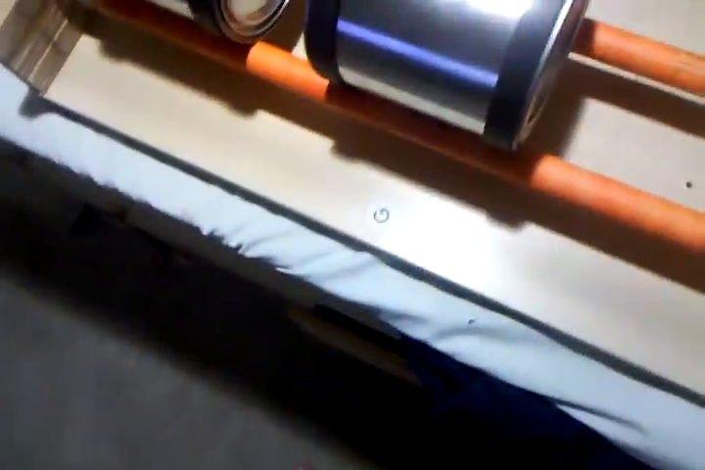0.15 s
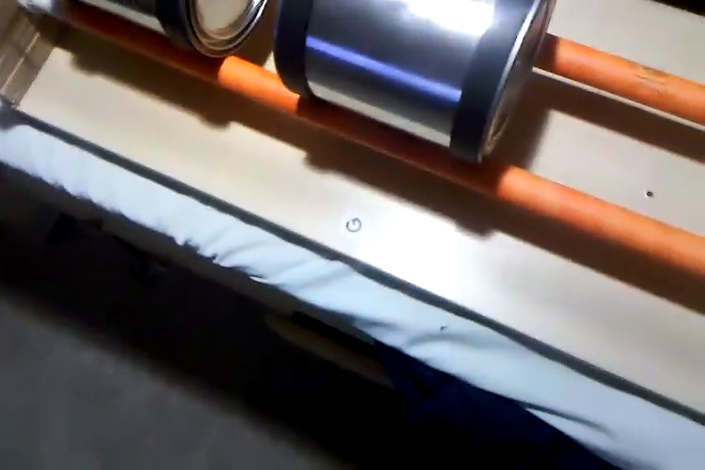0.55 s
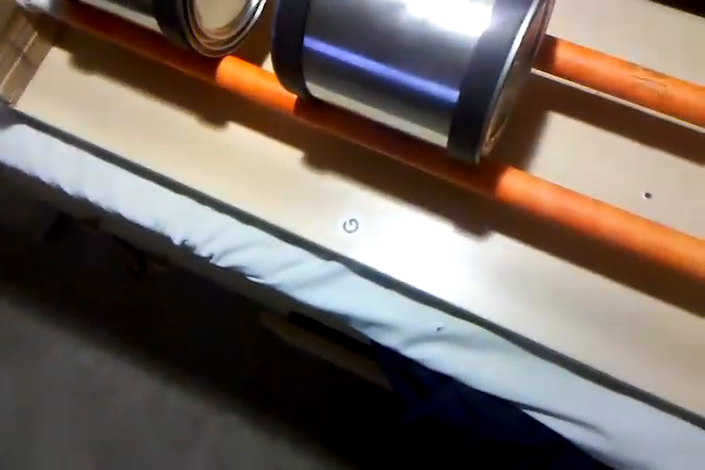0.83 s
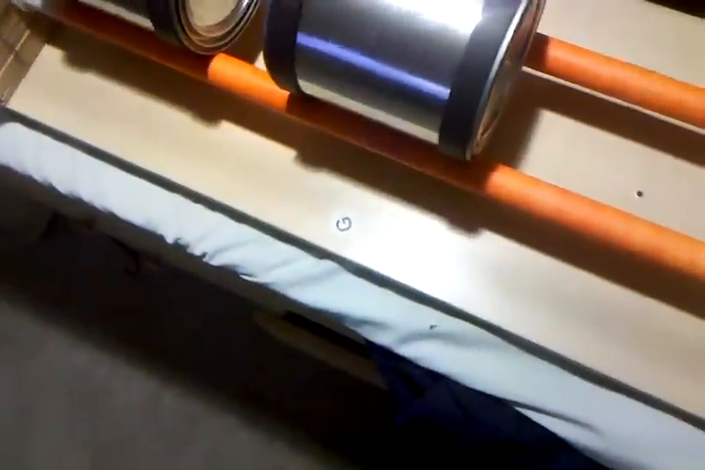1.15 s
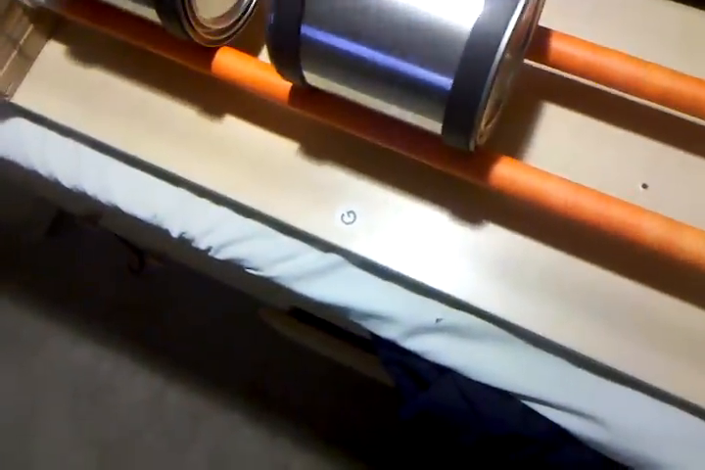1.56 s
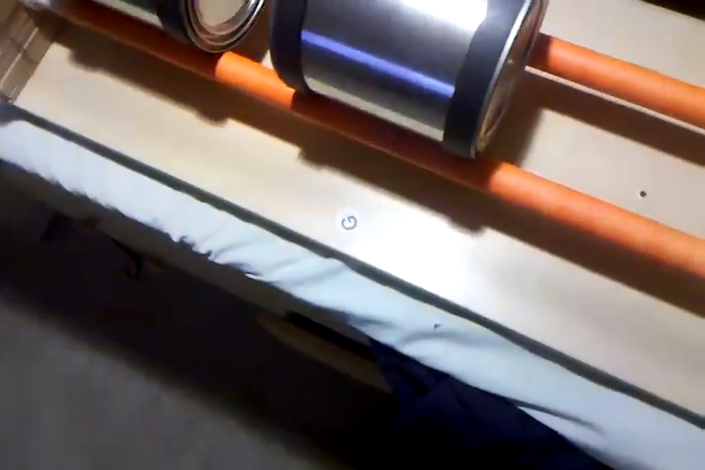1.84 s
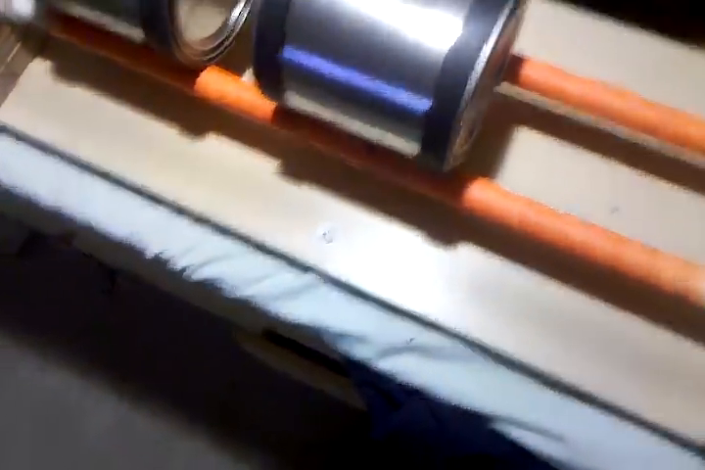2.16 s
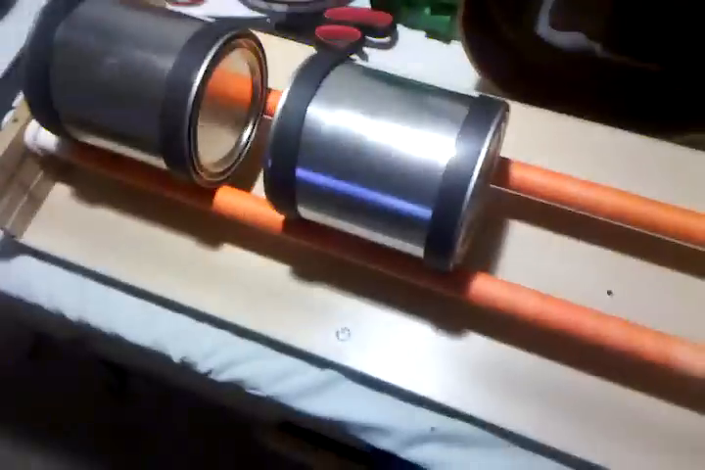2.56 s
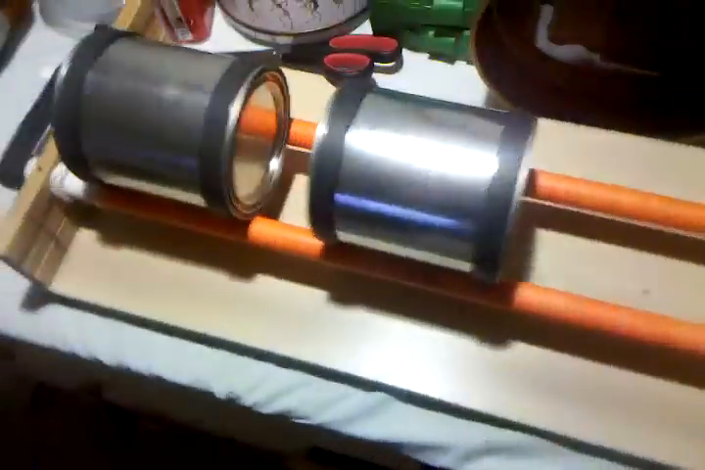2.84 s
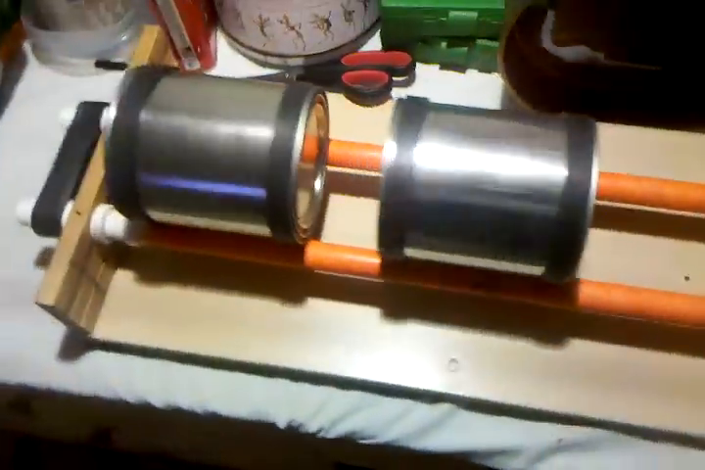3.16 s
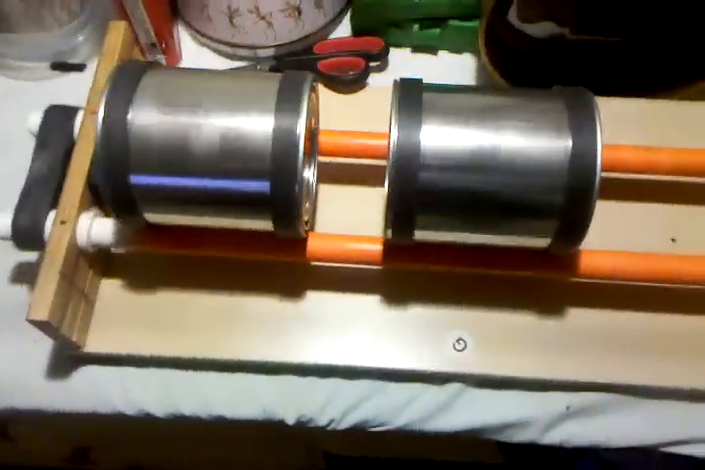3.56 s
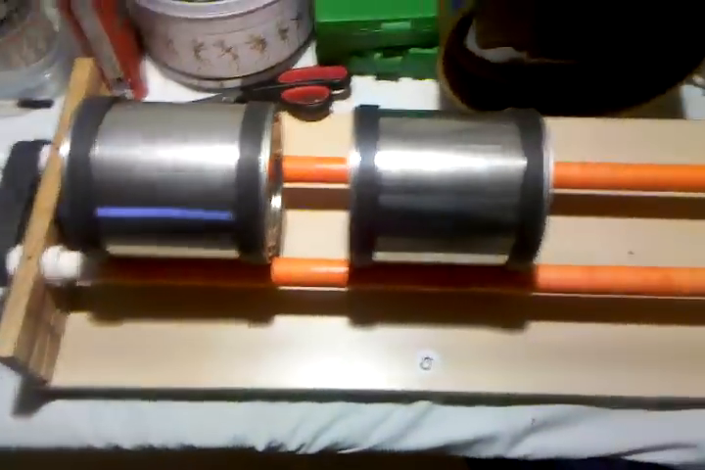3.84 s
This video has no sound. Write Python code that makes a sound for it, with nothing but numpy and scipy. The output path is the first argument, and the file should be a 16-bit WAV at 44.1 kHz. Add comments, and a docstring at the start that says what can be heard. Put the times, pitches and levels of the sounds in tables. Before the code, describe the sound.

Stones tumbling in two metal cans, heard close up indoors. Over a dull rumble, a light tap comes at 0.2 seconds and two sharp switch clicks around 0.8. At 1.1 a small geared motor grinds briefly and spins up, its whine strongest near 1.5. From 1.4 until the end at 4 seconds, the stones rattle and knock loudly in uneven, ringing clumps over roller hiss and a softer whine.

```python
"""Indoors, in a quiet room, with the microphone close to two rollers on a wooden frame.
Over a dull rumble come a light tap and the two clicks of a switch. A small geared motor grinds
briefly and spins up, its gears whining through their housing as it turns the rollers. Two metal
cans ride on them; the stones inside tumble and knock on the walls in clumps, making them ring.
The room gives the clicks and knocks a short tail."""
import sys
import numpy as np
from scipy import signal
from scipy.fft import rfft, irfft
from scipy.io import wavfile

SR = 44100
rng = np.random.default_rng(int(sys.argv[2]) if len(sys.argv) > 2 else 0)


def pcm_store(signal):
    """Save signal as 16-bit PCM."""
    levels = np.round(np.clip(np.atleast_2d(signal), -1, 1) * 32767)
    wavfile.write(sys.argv[1], SR, levels.astype(np.int16).T)


N = 176400

# Vigour of the tumbling stones. Each row: time in seconds, level in dB.
TUMBLE = [(1.38, -27.5), (1.45, -6.5), (1.62, -11), (1.72, -26), (1.82, -7.5), (2.0, -26), (2.08, -16.5),
          (2.3, -11.5), (2.42, -14.5), (2.66, -21), (2.76, -14), (2.9, -16), (3.13, -19.5), (3.2, -11),
          (3.5, -11), (3.62, -20), (3.7, -10.5), (3.9, -18), (4, -5)]


def amp(db):
    return 10 ** (np.asarray(db) / 20)


def rms_one(x):
    return x / np.sqrt(np.mean(x ** 2) + 1e-20)


def in_time(rows, before_db=None):
    s, db = np.transpose(rows)
    return np.interp(np.arange(N) / SR, s, db, left=before_db)


def level_at(spectrum, hz):
    at, db = np.transpose(spectrum)
    return np.interp(np.log(hz), np.log(at), db)


def drift(rate_hz):
    """Slow random wander, spread 1."""
    r = np.exp(-80 * np.pi * rate_hz / SR)
    slow = signal.lfilter([1], [1, -2 * r, r * r], rng.standard_normal(N // 40 + 2002))[2000:]
    return np.interp(np.arange(N) / 40, np.arange(len(slow)), rms_one(slow))


def noise(spectrum):
    """Noise shaped to a spectrum, flat above 7 kHz; rms 1."""
    hz = np.clip(np.fft.rfftfreq(N, 1 / SR), 1, 7000)
    return rms_one(irfft(rfft(rng.standard_normal(N)) * amp(level_at(spectrum, hz)), N))


def ring(x, hz, t60):
    """A unit click sets a sine of height 1 ringing."""
    r, w = amp(-60 / (t60 * SR)), 2 * np.pi * hz / SR
    return signal.lfilter([0, np.sin(w)], [1, -2 * r * np.cos(w), r * r], x + 1e-18)


def blows(s, db, main_hz, colour, cycles, main_db, scatter_db, main_cycles=48, spread_s=.0012):
    """Each blow starts a main ring and 30 scattered ones, 60 dB down after their cycles; it peaks at db."""
    out, t = np.zeros(N + SR), np.arange(2000) / SR
    for start, peak_db, main, (detune, gain, lag) in zip(s, db, main_hz, rng.random((len(s), 3, 30))):
        hz = np.geomspace(400, 7200, 30) * (1 + 0.22 * (detune - .5))
        level = np.append(level_at(colour, hz) + scatter_db * (2 * gain - 1), main_db)
        life = np.append(np.full(30, cycles), main_cycles)
        delay = np.append(spread_s * lag ** 2, 0)
        age = np.maximum(t - delay[:, None], 0) * np.append(hz, main)[:, None]   # in cycles
        wave = amp(level) @ (amp(-60 * age / life[:, None]) * np.sin(2 * np.pi * age))
        i = int(start * SR)
        out[i:i + len(t)] += amp(peak_db) * wave / np.abs(wave).max()
    return out[:N]


def room_floor():
    """Room tone: a dull lumpy rumble with two wavering hums."""
    # Colour of the rumble. Each row: frequency in Hz, relative density in dB.
    colour = [(53, -32), (90, -7), (170, -7.5), (241, -10), (447, -10.5), (831, -18.5), (1170, -22.5),
              (7000, -41.5)]
    # Faint hums. Each row: pitch in Hz, level in dB.
    tones = [(104, -50.5), (895, -60.5)]
    t = np.arange(N) / SR
    hums = sum(amp(db + 1.2 * drift(6.5)) * np.sin(2 * np.pi * hz * t + 0.27 * drift(11))
               for hz, db in tones)
    return amp(-47 + drift(6.6)) * noise(colour) + hums


def clicks():
    """The tap and the switch clicks ring a small hard body."""
    # Tap and clicks. Each row: start in seconds, peak in dB.
    hits = [(0.1684, -28), (.177, -21), (.1945, -32), (.7622, -6), (0.7648, -12), (0.8336, -11)]
    # How strongly the switch body rings. Each row: frequency in Hz, relative level in dB.
    body = [(680, -26), (1230, -20), (1650, -6.5), (2300, -2.5), (3560, -1.5), (4300, -3), (5370, -1.5),
            (6500, 7.5)]
    s, db = np.transpose(hits)
    x = blows(s, db, np.full(len(s), 3560.), body, cycles=55, main_db=3, scatter_db=4)
    return signal.sosfilt(signal.butter(2, 550, "high", fs=SR, output="sos"), x)


def room(x, t60=0.36):
    """Reflections from the walls merge into a dying noise tail."""
    t = np.arange(SR // 2) / SR
    tail = rng.standard_normal(len(t)) * amp(-60 * t / t60) * np.minimum(t / 0.0067, 1)
    return signal.fftconvolve(x, tail / np.sqrt(np.sum(tail ** 2)))[:N]


def motor(start_s=1.09, spinup_s=.17, full_hz=235.6, creep_hz_per_s=1.3):
    """The rotor spins up, then creeps faster, sounding one cycle a turn and driving the gears."""
    # Rotor tone. Each row: time in seconds, level in dB.
    levels = [(1.15, -46), (1.3, -40), (1.5, -34.5), (1.75, -39), (2.8, -36.5), (4, -42)]
    running_s = np.maximum(np.arange(N) / SR - start_s, 0)
    speed = 1 - np.exp(-running_s / spinup_s)
    rotor_hz = (full_hz + creep_hz_per_s * running_s) * speed
    turns = np.cumsum(rotor_hz) / SR
    rotor = amp(in_time(levels, -120) + drift(24)) * np.sin(2 * np.pi * turns)
    return rotor + gear_whine(turns, speed) + gear_overtones(turns, speed, rotor_hz)


def gear_whine(turns, speed, swell_db=8, swell_s=.3):
    """Meshing teeth whine through the resonant housing, rough at low speed and louder under load."""
    # Gear partials. Each row: multiple of rotor speed, relative level in dB, top of its swell in seconds.
    partials = [(10.95, -9, 2.8), (11.5, -14, 3.1), (12.0, 0, 3.85), (12.51, -8, 3.4)]
    # Load on the gears. Each row: time in seconds, gain of the whine in dB.
    load = [(1.1, -70), (1.13, -40), (1.18, -41), (1.25, -38), (1.38, -30.5), (1.5, -26.5), (1.7, -47.5),
            (2.5, -43), (4, -42)]
    # Gearbox resonances. Each row: centre in Hz, width in Hz, gain over the plain whine in dB.
    housing = [(720, 280, -3.5), (1260, 200, 16.5), (2010, 76, 3), (2620, 180, 7.5)]
    t, mesh = np.arange(N) / SR, np.zeros(N)
    for multiple, db, top_s in partials:
        swell = swell_db * np.exp(-((t - top_s) / swell_s) ** 2)
        flicker = drift(14) + 7.7 * (1 - speed) * drift(150)
        mesh += amp(db + swell + flicker) * np.sin(2 * np.pi * multiple * (turns + .002 * drift(80)))
    resonances = sum(amp(db) * signal.lfilter(*signal.iirpeak(hz, hz / width, fs=SR), mesh)
                     for hz, width, db in housing)
    return amp(in_time(load, -120)) * (mesh + resonances)


def gear_overtones(turns, speed, rotor_hz):
    """High overtones of the whine sound while the motor strains up to speed."""
    # Overtones. Each row: multiple of rotor speed, relative level in dB.
    overtones = [(24, -20), (36, -17), (48, -16)]
    # What the housing lets out. Each row: frequency in Hz, gain in dB.
    outlet = [(2600, -20), (3300, -2), (4500, -4), (4900, -25), (5900, 0)]
    strain = speed ** 3 * (1 - speed)
    out = np.zeros(N)
    for multiple, db in overtones:
        level = amp(db + level_at(outlet, multiple * rotor_hz + 1) + 3.6 * drift(150))
        out += level * np.sin(2 * np.pi * multiple * (turns + .004 * drift(120)))
    return strain * out


def roller_hiss(tumble_share=.25, mean_tumble_db=-18):
    """Motor and rollers hiss, following a share of the tumbling's swing in level."""
    # Course of the hiss. Each row: time in seconds, base level in dB.
    levels = [(1.09, -55), (1.17, -49), (1.29, -27), (1.66, -16.5), (2.45, -18), (2.68, -15.5), (3.43, -15),
              (3.72, -18.5), (4.0, -17)]
    # Its colour. Each row: frequency in Hz, relative density in dB.
    colour = [(60, -45), (100, -13), (230, -15.5), (300, -17), (415, -12.5), (850, -9), (1600, -17.5),
              (2600, -3), (4500, -12), (6600, -2)]
    swing_db = tumble_share * (in_time(TUMBLE) - mean_tumble_db)
    return amp(in_time(levels, -120) + swing_db + 1.2 * drift(30)) * noise(colour)


def startup_grind(start_s=1.1, rise_s=0.04, fall_s=0.06):
    """A short rough burst as the motor gets going."""
    # Colour of the grind. Each row: frequency in Hz, relative density in dB.
    colour = [(400, -48), (580, -19), (654, -3), (871, -7), (2240, -4), (4440, -23.5), (7000, -11.5)]
    age = np.maximum(np.arange(N) / SR - start_s, 0)
    swell = (1 - np.exp(-age / rise_s)) * np.exp(-age / fall_s)
    return amp(-13 + 2.8 * drift(45)) * swell * noise(colour)


def cans(ticks_per_s=300, ring_cycles=45):
    """Stones strike the can walls: loud knocks over clumps of small ringing ticks."""
    # Loudest knocks. Each row: start in seconds, peak in dB, main pitch in Hz.
    hits = [(1.431, -6.5, 2020), (1.446, -2, 2600), (1.474, -5, 2440), (1.559, -3.5, 2500),
            (1.586, -5.5, 2550), (1.61, -5.5, 2620), (1.75, -5.5, 2550), (1.796, -3.5, 2350),
            (1.843, -5.5, 2230), (2.064, -2.5, 2620), (2.205, -4.5, 2400), (2.232, -0.5, 2320),
            (2.25, -4.5, 2180), (2.275, -0.5, 2320), (2.321, -4, 2800), (2.343, -3.5, 2540),
            (2.38, -0.5, 2310), (2.457, -13, 2250), (2.48, -5, 2360), (2.544, -3, 2230), (2.565, -6, 1384),
            (2.593, -3, 4000), (2.652, -13, 2520), (2.702, -2, 2610), (2.779, 1.5, 1800), (2.857, -8, 2610),
            (2.946, -7, 2230), (2.977, -7, 2030), (3.047, -3, 5900), (3.108, -7.5, 2680),
            (3.148, -7.5, 2280), (3.17, -5, 2120), (3.286, -8, 2380), (3.323, -2, 2440),
            (3.396, -9.5, 2350), (3.422, -4.5, 5170), (3.441, -9.5, 2380), (3.487, -1.5, 2250),
            (3.532, -1.5, 2330), (3.685, -5, 2960), (3.721, -5.5, 2080), (3.764, -9, 2870),
            (3.799, -2, 3280), (3.95, -6.5, 2280), (3.977, -2, 2240), (1.204, -16.5, 670),
            (1.384, -16, 3860), (1.4465, -9.5, 4950), (2.2325, -6, 4600), (1.502, -7.5, 2080),
            (1.645, -5, 2230), (2.3815, 2.5, 4034), (2.395, -4, 2320), (2.483, -12.5, 1390),
            (3.186, -2, 2220), (3.215, -5.5, 2200), (3.294, -4.5, 2370), (3.359, -13.5, 421),
            (3.543, -2, 3560)]
    # How strongly cans and stones ring. Each row: frequency in Hz, relative level in dB.
    body = [(400, -50), (800, -23), (1400, -16), (2300, -4), (3200, -4.5), (4200, -0.5), (5500, -4),
            (7000, -3.5)]
    at = np.flatnonzero(rng.random(N) < ticks_per_s * amp(3 * drift(25)) / SR)
    size_db = 3 * np.minimum(rng.exponential(1, len(at)), 2)
    ticks = np.zeros(N)
    for hz in np.geomspace(400, 7200, 36):
        strength = amp(level_at(body, hz) + size_db + rng.normal(0, 4.5, len(at)))
        onsets = np.minimum(at + rng.integers(0, 30, len(at)), N - 1)
        kicks = np.zeros(N)
        kicks[onsets] = strength * rng.choice([-1, 1], len(at))
        ticks += ring(kicks, hz, ring_cycles / hz)
    rattle = amp(in_time(TUMBLE, -120) - 11) * rms_one(ticks)
    s, db, pitch = np.transpose(hits)
    knocks = blows(s, db, pitch, body, ring_cycles, main_db=8, scatter_db=8)
    return signal.sosfilt(signal.butter(4, 380, "high", fs=SR, output="sos"), knocks + rattle)


def scene():
    """The sound at one microphone, mostly direct; only the struck sounds reverberate."""
    struck = clicks() + cans()
    drive = motor() + roller_hiss() + startup_grind()
    return (room_floor() + struck + amp(-12) * room(struck) + drive)[None]


def record(dry, overload=.76):
    """The microphone path loses bass and treble, the loudest peaks clip, the top is cut."""
    x = signal.sosfilt(signal.butter(8, 94, "high", fs=SR, output="sos"), dry)
    x = signal.sosfilt(signal.ellip(5, 1, 37, 6850, fs=SR, output="sos"), x)
    x = signal.sosfilt(signal.ellip(10, .5, 70, 9100, fs=SR, output="sos"), x)
    x = np.clip(x, -overload, overload)
    return signal.sosfilt(signal.cheby2(12, 70, 15900, fs=SR, output="sos"), x)


dry = scene()
out = record(dry)
pcm_store(out)
```